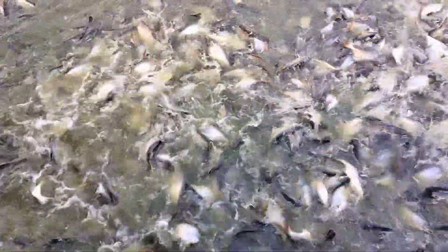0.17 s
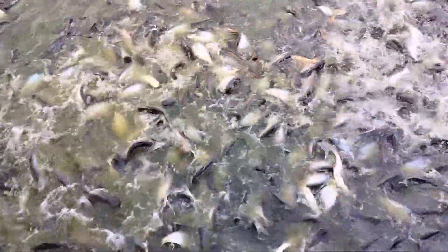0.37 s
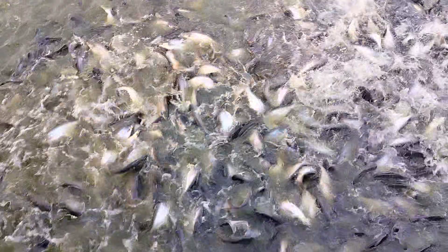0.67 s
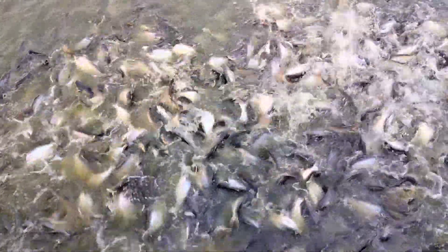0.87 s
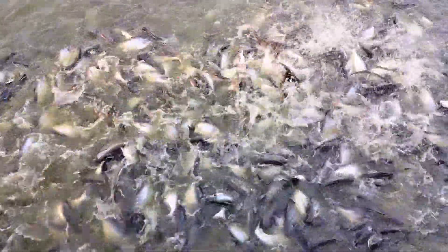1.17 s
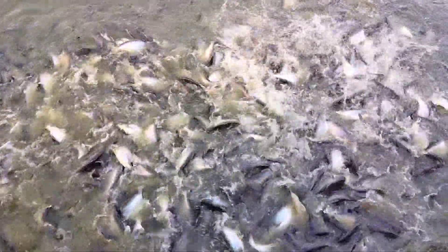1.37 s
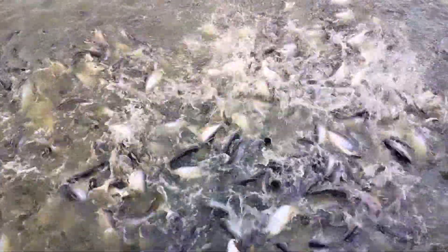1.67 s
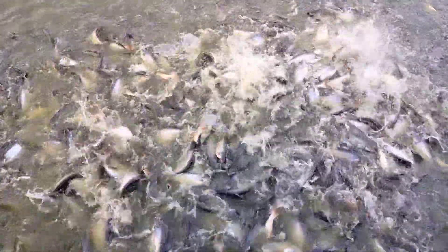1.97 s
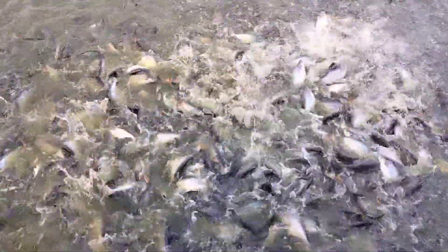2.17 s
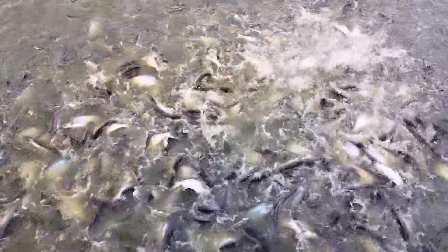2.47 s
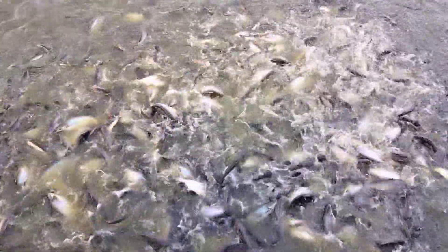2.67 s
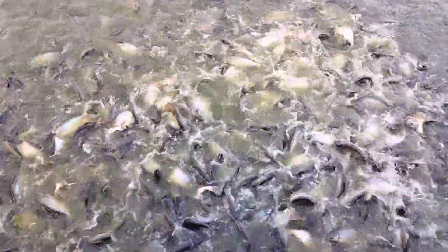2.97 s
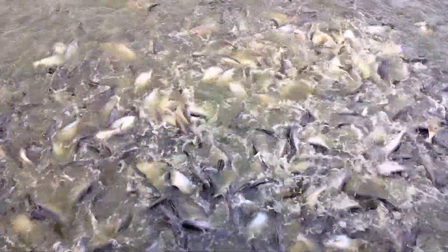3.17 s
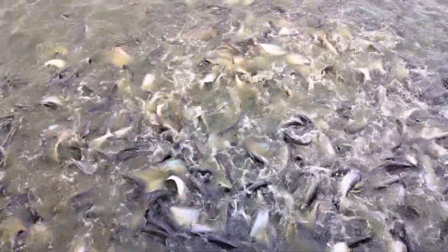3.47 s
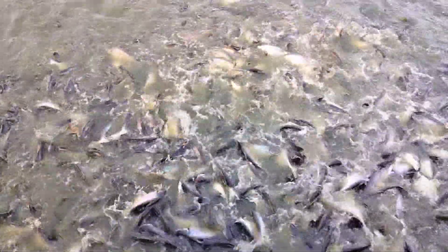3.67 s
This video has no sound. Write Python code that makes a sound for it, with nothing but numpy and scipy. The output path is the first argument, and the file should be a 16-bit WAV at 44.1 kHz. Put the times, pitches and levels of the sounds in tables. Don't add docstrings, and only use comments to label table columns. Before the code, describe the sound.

A shoal of fish thrashes at a pond surface: continuous dense splashing with tail slaps, hollow plops and bright droplet ticks, easing toward the end; outdoors, hand-held phone a few metres away, wide stereo.

```python
import sys
import numpy as np
from scipy import signal
from scipy.io import wavfile
from scipy.ndimage import uniform_filter1d

SR = 44100
rng = np.random.default_rng(int(sys.argv[2]) if len(sys.argv) > 2 else 0)


def output_pcm(signal):
    pcm = np.clip(np.atleast_2d(signal).T, -1, 1) * 32767
    wavfile.write(sys.argv[1], SR, np.round(pcm).astype(np.int16))


def gain_from_decibels(decibels):
    exponent = np.asarray(decibels, float) / 20
    return 10 ** exponent


N = 168462
BINS_HZ = np.fft.rfftfreq(4096, 1 / SR)
LEAD_S, SPREAD_S = 7e-5, 2.4e-4
RISE = 0.145


def evened(x):
    return x / np.sqrt(np.mean(x ** 2) + 1e-20)


def read(points, hz):
    f, value = np.transpose(points)
    return np.interp(np.log(hz + 1), np.log(f + 1), value)


def control(column):
    # t/s, frenzy level/dB, extra bubbling/dB
    frenzy = [(0, -20.5, 3), (0.197, -22, 1.5), (.45, -22, 3.5), (0.702, -22.5, 1), (1.001, -21.5, 1.5),
              (1.3, -22, -0.5), (1.53, -21.5, 5), (1.565, -19, -1), (1.62, -21.5, -4), (1.95, -20.5, -6),
              (2.3, -22, 1.5), (2.549, -24, 2.5), (2.698, -26, -2), (3, -24.5, 1), (3.3, -26.5, -8.5),
              (3.6, -27.5, 6), (3.74, -30, 4), (3.82, -29, -2)]
    rows = np.array(frenzy)
    return np.interp(np.arange(N) / SR, rows[:, 0], rows[:, column])


def ebb_db():
    frenzy_db = control(column=1)
    return frenzy_db - frenzy_db.max()


def drift(top_hz):
    t = np.arange(0, N + 64, 64) / SR
    hz = np.geomspace(top_hz / 10, top_hz, num=24)
    phase = hz[:, None] * t + rng.random((len(hz), 1))
    wave = np.sin(2 * np.pi * phase).sum(0)
    return np.interp(np.arange(N) / SR, t, evened(wave))


def colour(x, db):
    log_gain = np.log(gain_from_decibels(np.maximum(db, -100)))
    circle = np.concatenate([log_gain, log_gain[-2:0:-1]])
    taps = np.fft.ifft(np.exp(np.conj(signal.hilbert(circle)))).real
    taps = taps.reshape((1,) * (x.ndim - 1) + (-1,))
    return signal.oaconvolve(x, taps, axes=-1)[..., :N]


def add(mix, s, sound, side):
    arrivals = (s + SPREAD_S, s + SPREAD_S * (1 + side) + LEAD_S)
    for channel, at in zip(mix, arrivals):
        part = channel[int(at * SR):][:len(sound)]
        part += sound[:len(part)]


def bubble(hz, cycles, rise, onset=0.49):
    t = np.arange(int(3 * cycles / hz * SR) + 8) * hz / SR
    envelope = (1 - np.exp(-t / onset)) * np.exp(-2 * t / cycles)
    return envelope * np.sin(2 * np.pi * t * (1 + rise * t / cycles / 2))


def scatter(shapes, per_s, spread_db, bunching):
    u = rng.random((int(per_s * N / SR), 5))
    odds = np.cumsum(bunching)
    at = np.searchsorted(odds / odds[-1], u[:, 0])
    size_db = spread_db * np.minimum(-np.log(u[:, 1] + 1e-9), 3.2)
    size = gain_from_decibels(size_db) * np.sign(u[:, 2] - .5)
    lag_s = LEAD_S + SPREAD_S * (2 * u[:, 3] - 1)
    late = at + np.round(lag_s * SR).astype(int)
    which = (u[:, 4] * len(shapes)).astype(int)
    out = np.zeros((2, N))
    for k, shape in enumerate(shapes):
        mine = which == k
        trains = [np.bincount(np.clip(p[mine], 0, N - 1), size[mine], N) for p in (at, late)]
        out += signal.oaconvolve(np.array(trains), shape[None], axes=1)[:, :N]
    return evened(out)


def air():
    # f/Hz, level/dB
    rumble = [(20, -17), (45, -8), (65, -4.5), (120, 2), (200, 0), (400, -18), (1000, -45)]
    noise = rng.standard_normal((3, N))
    nearly_same = noise[0] + 0.098 * noise[1:]
    return gain_from_decibels(-60.5) * evened(colour(nearly_same, read(rumble, BINS_HZ)))


def rush():
    # f/Hz, likeness/0-1
    likeness = [(60, 0.8), (200, 0.8), (380, 1), (700, 1), (1290, 0.78), (2000, 0.48), (4000, 0.05)]
    level_db, patch_db, thinning = 8, 0.64, .3
    hz = np.fft.rfftfreq(512, 1 / SR)
    a, b, c, d, patches = rng.standard_normal((N // 128 + 5, 257, 5)).T
    patches = uniform_filter1d(patches, size=6, axis=0)
    patches = evened(uniform_filter1d(patches, size=12, axis=1))
    same = np.clip(read(likeness, hz), 0, 1)[:, None]
    lag = np.exp(-2j * np.pi * hz * LEAD_S)[:, None]
    left = a + 1j * b
    right = same * lag * left + np.sqrt(1 - same ** 2) * (c + 1j * d)
    z = np.array([left, right]) * gain_from_decibels(patch_db * patches)
    noise = signal.istft(z, nperseg=512, noverlap=384)[1][:, :N]
    return gain_from_decibels(level_db + thinning * ebb_db()) * evened(noise)


def glugs():
    shapes = [bubble(hz, 3, RISE) for hz in np.geomspace(220, 480, num=10)]
    bunching = gain_from_decibels(2 * control(column=1))
    return gain_from_decibels(-9 + ebb_db()) * scatter(shapes, per_s=70, spread_db=1.5, bunching=bunching)


def bubbles(surge):
    level_db, tilt_db = -7.5, -2.5
    shapes = []
    for hz in np.geomspace(330, 5000, num=32):
        ring = bubble(hz, rng.uniform(3.4, 17.4), RISE)
        tilt = gain_from_decibels(tilt_db * np.log2(hz / 800))
        shapes.append(ring / np.linalg.norm(ring) * np.sqrt(hz) * tilt)
    grains = scatter(shapes, per_s=900, spread_db=4.5, bunching=surge ** 1.5)
    return gain_from_decibels(level_db + control(column=2)) * grains


def drops(surge):
    shapes = []
    for hz in np.geomspace(900, 15000, num=24):
        tick = bubble(hz, rng.uniform(0.75, 1.7), 0.16)
        shapes.append(tick / np.linalg.norm(tick) * np.sqrt(hz))
    return gain_from_decibels(1.5) * scatter(shapes, per_s=2600, spread_db=3.5, bunching=surge ** 2.8)


def ticks():
    # t/s, peak level/dB
    near_drops = [(0.059, -5), (0.1605, -11), (0.2548, -9), (0.2972, -8), (0.414, -12), (0.4863, -17),
                  (0.782, -15), (0.8594, -20), (0.9273, -19), (0.967, -17), (0.9812, -5), (1.0705, -24),
                  (1.1333, -9), (1.2326, -25), (1.486, -17), (1.5529, -22), (1.6571, -21), (1.933, -9),
                  (1.9799, -13), (2.1839, -25), (2.239, -11), (2.3416, -17), (2.3533, -8), (2.4054, -20),
                  (2.4417, -15), (2.4887, -7), (2.5815, -17), (2.7766, -15), (2.8764, -11), (3.075, -11),
                  (3.2231, -24), (3.349, -18), (3.4037, -9.5), (3.5942, -24), (3.778, -9.5), (3.7973, -20)]
    level_db, pitches_hz, cycles = 9, (5500, 7300), 6
    out, u = np.zeros((2, N)), rng.random((len(near_drops), 2))
    for (s, db), (d, bend) in zip(near_drops, u):
        for hz in pitches_hz:
            click = bubble(hz * (.94 + .12 * bend), cycles * hz / pitches_hz[1], .05)
            add(out, s + 4e-4, gain_from_decibels(db + level_db) * click, 2 * d - 1)
    return out


def plops():
    # t/s, peak level/dB, f/Hz
    cavities = [(0.058, -14, 634), (0.172, -9.5, 760), (0.336, -17.5, 464), (0.447, -12, 970),
                (0.491, -12, 940), (0.628, -12, 725), (0.88, -16, 805), (0.994, -11, 960),
                (1.083, -12, 950), (1.128, -9.5, 680), (1.33, -12, 815), (1.55, -14.5, 1200),
                (1.813, -7, 850), (1.974, -8, 900), (2.056, -9, 730), (2.27, -8, 767), (2.465, -12, 650),
                (2.77, -21, 920), (2.869, -11.5, 730), (3.036, -11, 692), (3.112, -13, 1010),
                (3.149, -9, 746), (3.22, -10, 930), (3.703, -15, 895), (.136, -15, 655), (.25, -13.5, 664),
                (.267, -13, 990), (.683, -22, 1070), (.907, -11, 845), (1.168, -17, 770), (1.228, -17, 730),
                (1.406, -10.5, 929), (1.465, -13, 725), (1.502, -17, 755), (1.659, -15, 826),
                (1.782, -23, 876), (1.886, -10.5, 930), (2.126, -30, 1210), (2.331, -11, 990),
                (2.544, -18, 810), (2.582, -16, 1120), (2.808, -15, 980), (2.85, -15, 915),
                (2.933, -15.5, 666), (2.983, -17, 1480), (3.069, -13.5, 1030), (3.117, -15, 1270),
                (3.307, -16, 697), (3.415, -16, 706), (3.438, -17, 1360), (3.476, -16, 1390),
                (3.718, -18.5, 725), (3.778, -23, 900), (3.8, -19, 990)]
    # t/s, peak level/dB, f/Hz, ring/ms
    gulps = [(0.172, -32, 305, 10), (0.297, -27.5, 235, 7.8), (.32, -26, 440, 21), (0.751, -30, 338, 15),
             (0.967, -31.5, 286, 14), (1.069, -28, 322, 19), (1.158, -19.5, 234, 14),
             (1.291, -23.5, 425, 19), (1.55, -30, 248, 12), (1.562, -28, 389, 11), (1.799, -34.5, 201, 16),
             (1.881, -27.5, 167, 10.3), (1.878, -22.5, 376.5, 40), (1.899, -15.5, 426, 10),
             (2.033, -29.5, 377, 17), (2.06, -34, 298, 15), (2.339, -35, 250, 16), (2.851, -30, 277, 12),
             (2.859, -32, 365, 21), (3.02, -33.5, 242, 19), (3.318, -26.5, 386, 29), (3.688, -39, 294, 18),
             (3.735, -30, 460, 11), (3.7, -32.5, 307, 12), (2.95, -36, 290, 17)]
    # t/s, peak level/dB, start f/Hz, ring/ms, climb/ratio
    chirps = [
        (3.65, -26, 2150, 8, .15),
        (3.671, -25, 2560, 6, .03),
        (3.495, -25, 560, 18, .3),
        (3.548, -22, 640, 12, .3),
        (3.596, -23, 680, 10, .3),
        (3.33, -29, 1340, 13, .01),
    ]
    out = np.zeros((2, N))
    for s, db, hz in cavities:
        add(out, s, gain_from_decibels(db - 4) * bubble(hz, 9, RISE), 0)
    for s, db, hz, ms in gulps:
        cycles = max(2 * ms * hz / 1000, 1)
        add(out, s, gain_from_decibels(db - 0.5) * bubble(hz, cycles, 0.0096, 0.98), 0)
    for s, db, hz, ms, climb in chirps:
        add(out, s, gain_from_decibels(db) * bubble(hz, 2 * ms * hz / 1000, climb, 1.6), 0)
    return signal.sosfilt(signal.butter(2, 130, "highpass", fs=SR, output="sos"), out)


def slaps():
    # t/s, peak level/dB
    tail_hits = [(0.0574, -12), (0.3052, -9), (0.3521, -8), (0.857, -10), (0.8959, -12), (0.9762, -9),
                 (1.0874, -8), (1.1368, -9), (1.3518, -8), (1.4684, -9), (1.513, -7), (1.5359, -6),
                 (1.5549, -7), (1.5814, -11), (1.9829, -7), (2.1445, -10), (2.2752, -10), (2.3416, -6),
                 (2.4877, -11), (2.5814, -11), (2.6494, -11), (2.7062, -9), (2.7766, -10), (2.8554, -13),
                 (2.8853, -9), (3.0235, -11), (3.254, -13), (3.4042, -8), (3.5029, -13), (3.7778, -15),
                 (.1765, -11), (.6848, -12), (.7821, -12), (.9073, -8), (1.0001, -12), (1.1578, -11),
                 (1.7978, -11), (2.0956, -10), (2.3535, -9), (2.5202, -13), (3.269, -14), (3.7865, -16),
                 (3.792, -16)]
    tick_db, tick_cycles, spray_ms = 7, 3, 2.5
    out, t_ms = np.zeros((2, N)), np.arange(1800) / SR * 1000
    noise = rng.standard_normal((len(tail_hits), len(t_ms)))
    u = rng.random((len(tail_hits), 2))
    envelope = np.minimum(t_ms / .7, 1) * np.exp(-t_ms / spray_ms)
    for (s, db), n, (d, bright) in zip(tail_hits, noise, u):
        side = 2 * d - 1
        tick = bubble(3500 + 700 * bright, tick_cycles, .1)
        add(out, s + 1e-3, gain_from_decibels(db + tick_db) * tick, side)
        add(out, s, gain_from_decibels(db - 1) * envelope * n, side)
    return out


def scene():
    # f/Hz, level/dB
    water = [(25, -64), (150, -23.5), (300, -14), (420, -2.5), (560, -1), (850, 2.5), (1300, -0.5),
             (2000, -10)]
    surge = gain_from_decibels(.6 * drift(top_hz=14) + 0.9345 * drift(top_hz=89.4))
    fine = surge * rush() + drops(surge) + bubbles(surge)
    fine = signal.sosfilt(signal.butter(3, 438, "highpass", fs=SR, output="sos"), fine)
    shoal = gain_from_decibels(control(column=1)) * (fine + glugs())
    return colour(shoal + slaps() + ticks(), read(water, BINS_HZ)) + plops() + air()


def port(x, slope, cavity):
    peaks_db = sum(db * np.exp(-((BINS_HZ - hz) / w) ** 2) for hz, w, db in cavity)
    return colour(x, read(slope, BINS_HZ) + peaks_db)


def gate(x):
    gate_db, gate_hz = (1.8, .8), 8300
    offset = 808
    frame = dict(nperseg=2048, noverlap=1024, window="cosine")
    hz, _, z = signal.stft(np.pad(x, ((0, 0), (offset, 0))), SR, **frame)
    power = uniform_filter1d(abs(z) ** 2, size=6, axis=1)
    db = 10 * np.log10(abs(power) + 1e-20)
    around = uniform_filter1d(np.maximum(db, -110), size=120, axis=1)
    around = around + np.clip((hz[:, None] - 12000) / 1000, 0, 2.2)
    edge_hz = 15850 - 600 * rng.random(z.shape[2]) ** 2
    stands_out = db > around - np.reshape(gate_db, (2, 1, 1))
    keep = (stands_out | (hz[:, None] < gate_hz)) & (hz[:, None] < edge_hz)
    return signal.istft(z * keep, SR, **frame)[1][:, offset:offset + N]


def top_cut(x):
    return signal.sosfilt(signal.butter(12, 15740, fs=SR, output="sos"), x)


def record(dry):
    # f/Hz, level/dB
    left_slope = [(300, -1), (1000, -0.5), (2000, 1.5), (3000, 11.5), (5300, 7.5), (7600, 2), (9500, -12.5),
                  (15500, -19)]
    right_slope = [(300, -2), (1200, -3), (2000, 0.5), (2800, 5.5), (6500, -2), (7700, -3.5), (8300, -33),
                   (15500, -19)]
    # f/Hz, width/Hz, level/dB
    left_cavity = [(3858, 510, 10.5), (7160, 290, 5.5), (10300, 500, 4), (11840, 830, 5.5), (13200, 360, 5),
                   (14800, 400, 2)]
    right_cavity = [(4060, 100, 4), (6830, 72, 11.5), (11800, 400, 7), (12750, 220, -6), (14800, 700, 3.5)]
    # t/s, depth/dB, recovery/s
    ducks = [
        (.065, -2.5, .1),
        (1.1, -2.5, .04),
        (1.586, -6, .07),
        (2.89, -3, .04),
    ]
    both = np.array([port(dry[0], left_slope, left_cavity), port(dry[1], right_slope, right_cavity)])
    t = np.arange(N) / SR
    duck_db = sum(db * (t > s) * np.exp(-abs(t - s) / back) for s, db, back in ducks)
    both = both * gain_from_decibels(uniform_filter1d(duck_db, size=100))
    both = both / (1 + (abs(both) / .9) ** 6) ** (1 / 6)
    dead = signal.cheby2(8, 55, (8500, 9650), "bandstop", fs=SR, output="sos")
    both = np.array([both[0], signal.sosfilt(dead, both[1])])
    return top_cut(gate(both))


dry = scene()
out = record(dry)
output_pcm(out)
```